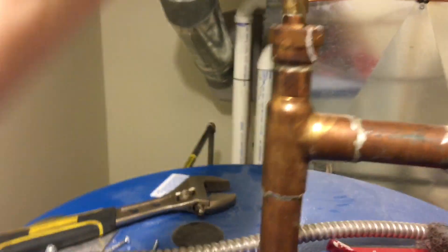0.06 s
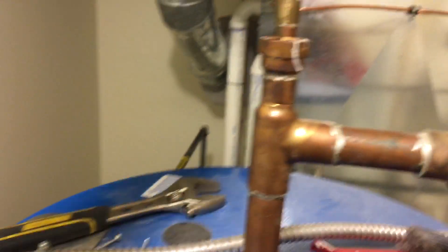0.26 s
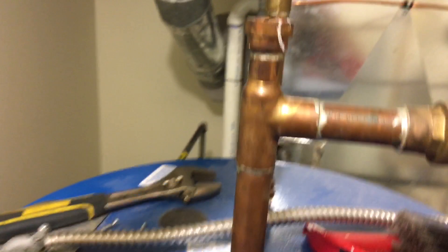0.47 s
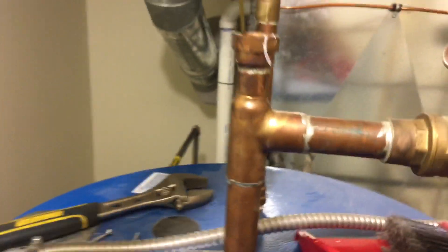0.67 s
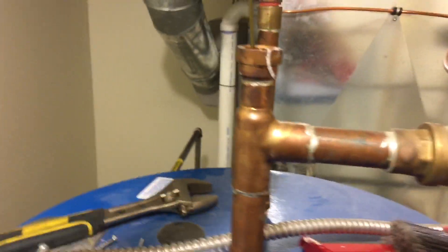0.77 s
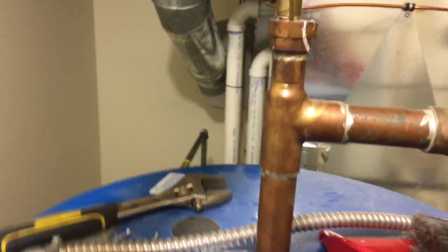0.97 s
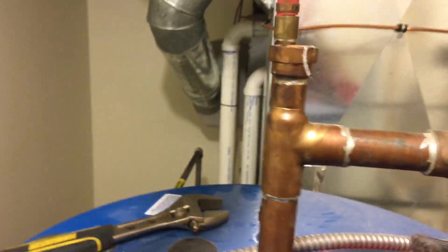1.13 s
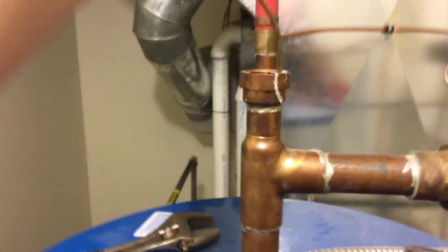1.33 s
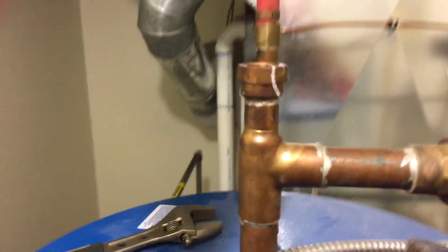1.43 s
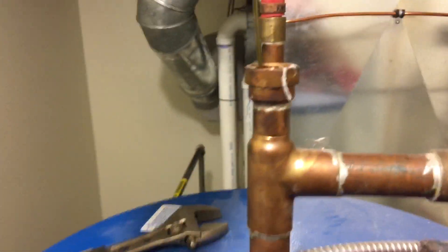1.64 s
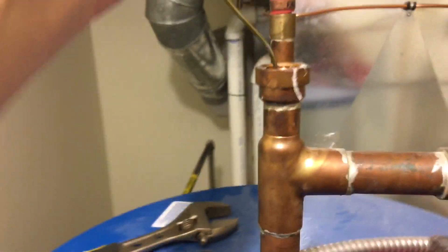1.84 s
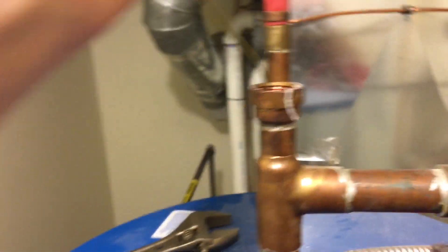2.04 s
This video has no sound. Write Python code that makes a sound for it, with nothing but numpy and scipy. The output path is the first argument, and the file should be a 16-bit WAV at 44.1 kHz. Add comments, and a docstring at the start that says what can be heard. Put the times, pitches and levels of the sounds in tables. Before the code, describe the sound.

A stiff wire clanks and scrapes inside a copper pipe, close up in a small hard-walled room. Clusters of sharp, briefly ringing knocks come around 0.3, 0.9, 1.1, 1.4 and 1.7 seconds, with lighter taps and short squeaky scrapes between. The knocks thin out after 1.8 seconds. Underneath, the water heater tank rumbles softly, a little more from 1.4 seconds, over a faint rush of room air.

```python
"""In a small hard-walled room, a stiff wire is worked up and down in a water heater's copper pipe.
Each knock shakes the pipework near 1 kHz, cracks, and rings three high notes in the tube wall.
Between knocks the wire catches and slips along the inside, which makes it scrape and squeak.
Underneath, the jostled tank rumbles and the room air gives a faint rush."""
import sys
import numpy as np
from scipy import signal
from scipy.fft import rfft, irfft
from scipy.io import wavfile

SR = 44100
rng = np.random.default_rng(int(sys.argv[2]) if len(sys.argv) > 2 else 0)


def store_pcm(level_fs):
    """Save levels as 16-bit WAV."""
    pcm = np.round(np.clip(level_fs, -1, 1) * 32767).astype(np.int16)
    wavfile.write(sys.argv[1], SR, np.atleast_2d(pcm).T)


N = 92610
T = np.arange(N) / SR
CLONK_RISE_S, CRACK_RISE_S, SLOW_RISE_S = 0.00064, 0.0002, 0.015
# sliding strokes of the wire: start/s, length/s, pipework level/dB, bright rasp level/dB
STROKES = [(.005, 0.055, -38, -50.5), (0.317, 0.15, -36, -33), (0.687, 0.08, -36, -29.5),
           (0.802, 0.11, -39, -27), (0.977, 0.073, -39.5, -31.5), (1.076, 0.072, -35.5, -32),
           (1.32, 0.046, -36.5, -35), (1.37, 0.038, -26.5, -19), (1.61, 0.081, -41, -51.5),
           (1.667, .03, -29.5, -17)]


def pipe(spot_count=3):
    """The wire knocks on a few spots in turn, each with its own tone, and scrapes on the first."""
    # the wire hits: t/s, then level/dB of low clonk, high clonk, crack and each of three wall notes
    hits = [(.091,-70,-67,-44.5,-83,-82,-84), (.166,-38,-34,-33.5,-45,-52,-37.5),
            (.222,-28.5,-28.5,-60,-67,-68,-57), (.238,-24,-27,-27,-32,-36,-33),
            (.259,-58,-21.5,-27.5,-42,-47,-34), (.272,-52,-17,-33,-24.5,-10,-15.5),
            (.2765,-21.5,-32,-27.5,-20,-45,-39), (.291,-29.5,-26,-25,-50,-44,-25),
            (.431,-34.5,-20.5,-35,-30.5,-43,-29.5), (.539,-36.5,-29,-37,-59,-46,-64),
            (.694,-36,-28,-31.5,-32.5,-38,-30), (.705,-41,-25.5,-52,-53,-47,-27),
            (.858,-35,-22.5,-46,-40,-27,-42), (.864,-26.5,-22,-22,-18.5,-26,-16),
            (.872,-29,-23,-31.5,-36.5,-34.5,-39), (1.121,-59,-26,-25.5,-30,-55,-42),
            (1.130,-27.5,-15.5,-22,-19,-30,-14.5), (1.135,-30,-22,-30,-25,-29,-44),
            (1.210,-32.5,-31,-37.5,-24,-25,-26), (1.363,-22,-18.5,-24,-17,-14,-18.5),
            (1.382,-19,-24.5,-27.5,-25,-37,-23), (1.400,-33.5,-20,-24,-29,-35,-45),
            (1.497,-41,-28,-42.5,-33,-37,-49), (1.540,-51,-29,-35.5,-51,-26.5,-33),
            (1.551,-35.5,-28.5,-28,-32,-29,-32), (1.572,-29.5,-25.5,-39,-45,-49,-39),
            (1.640,-51,-57,-39.5,-44,-41.5,-47), (1.659,-31,-22.5,-33.5,-39,-26,-31),
            (1.682,-29,-19,-28.5,-28.5,-20,-35.5), (1.697,-40,-23.5,-30.5,-39,-12.5,-17.5),
            (1.701,-51,-23,-31.5,-26.5,-18.5,-27), (1.773,-32,-20,-23,-32.5,-42,-32),
            (1.790,-23.5,-20.5,-26,-24,-30,-34.5), (1.870,-38.5,-37,-42,-50,-46,-52),
            (1.976,-46.5,-45.5,-42,-44,-63.5,-53.5), (2.092,-39.5,-36,-29.5,-36,-46.5,-50.5)]
    # clear pings left by some knocks: t/s, level/dB
    pings = [(.432, -29.5), (.70, -35.5), (.87, -36), (1.135, -27), (1.775, -30.5)]
    # the wire's own notes in a ping: f/Hz, level/dB, fade time/s
    wire_notes = [(2640, -6, .22), (2695, 0, .33), (2755, -2, .3), (2850, -4, .25)]
    spots = np.array([pipe_voices() for _ in range(spot_count)])
    forces = np.array([knocks(hits[k::spot_count]) for k in range(spot_count)])
    forces[0] += scrapes() / np.linalg.norm(spots[0], axis=1, keepdims=True)
    struck = sum(signal.fftconvolve(force, spot, axes=1).sum(axis=0)
                 for force, spot in zip(forces, spots))
    return (struck + signal.fftconvolve(impulses(pings), ring(wire_notes)))[:N]


def pipe_voices():
    """One tap sets off seven sounds that echo in the room: two clonks, crack, three wall notes, tick."""
    # notes of the clonks (the two lowest are the tank, set ringing by each clonk) and the tube wall's tick:
    # f/Hz, level/dB, fade time/s
    low_notes = [(381, -26.5, 0.49), (442, -23, 0.69), (656.4, -10, 0.31), (765.7, -8, 0.34),
                 (821, 1, 0.075), (904.5, -5, 0.15)]
    high_notes = [(1048, 9.5, 0.037), (1152, -34, 0.094), (1100, -20.5, 0.34), (1199, 3, 0.049),
                  (1238.5, -3.5, 0.19), (1292, -14.5, 0.12), (1450, -16, 0.38), (1804, -17.5, 0.22)]
    tick_notes = [(12325, -15, .12), (14510, -7, .11)]
    # tone of the noise in each sound: f/Hz, level/dB
    low_colour = [(180, -6), (400, -5), (540, -32.5), (780, 7.5), (930, -20.5), (1200, -14)]
    high_colour = [(800, -27), (1000, 4), (1250, 2), (1420, -6), (2400, -12)]
    crack_colour = [(1000, -1.5), (1750, -2.5), (2100, 0.5), (2720, 6.5), (3300, -5), (4050, -0.5),
                    (4500, -3), (5200, -4), (6800, -6), (12000, -41)]
    tick_colour = [(4500, -4), (7200, 8.5), (10300, 3.5), (11500, 8.5), (13500, 5), (16000, -12.5)]
    # notes of the tube wall: f/Hz, quick fade time/s, lingering level/dB, lingering fade time/s
    wall_notes = [(5837.5, 0.05, -25, 0.61), (7752, 0.028, -38.5, 0.26), (9520, 0.028, -23.5, 0.15)]
    # room echo of each of the seven sounds: level/dB in one list, fade time/s in the other
    echo_levels = [-7, -9.5, -8, -10, -13, -22, -12]
    echo_fades = [0.37, 0.39, 0.42, 0.3, 0.336, 0.5, 0.24]
    direct, colours = [], [low_colour, high_colour, crack_colour]
    for notes, colour in (low_notes, low_colour), (high_notes, high_colour):
        clonk = ring(notes) + from_db(-15) * noise(colour) * fade(0.15)
        direct.append(clonk * rise(CLONK_RISE_S))
    direct.append(noise(crack_colour) * fade(0.084) * rise(CRACK_RISE_S))
    for hz, quick_s, linger_db, linger_s in wall_notes:
        band = [(hz + 260 * k, db) for k, db in ((-4, -30), (-1, -14), (0, 0), (1, -14), (4, -30))]
        twin = (hz + 110, linger_db - 4.5, linger_s)  # a slightly oval tube gives each note a twin
        tone = ring([(hz, 0, quick_s), twin, (hz, linger_db, linger_s)])
        hiss = from_db(-11.5) * noise(band) * fade(quick_s)
        direct.append((tone + hiss) * rise(CRACK_RISE_S))
        colours.append(band)
    tick = noise(tick_colour) * fade(0.024) + ring(tick_notes)
    direct.append(tick * rise(CRACK_RISE_S))
    colours.append(tick_colour)
    return [even_start(sound) + from_db(db) * noise(colour) * rise(SLOW_RISE_S) * fade(fade_s)
            for sound, colour, db, fade_s in zip(direct, colours, echo_levels, echo_fades)]


def knocks(hits):
    """Where the wire lands decides how hard each of the seven sounds is struck."""
    times, low, high, crack, *wall = np.transpose(hits)
    tick = (crack + np.max(wall, axis=0)) / 2 - 0.5  # follows the crack and the loudest wall note
    return [impulses(zip(times, db)) for db in (low, high, crack, *wall, tick)]


def scrapes(slips_per_s=560, edge_s=0.012):
    """The sliding wire slips again and again, giving the pipe many tiny uneven pushes."""
    # share of the rasp in the crack, three wall notes and tick: level/dB
    rasp_shares = [-11.5, -14, -13, -11, -11.5]
    body, rasp = 0, 0
    for start, length, body_db, rasp_db in STROKES:
        stroke = np.clip(np.minimum(T - start, start + length - T) / edge_s, 0, 1)
        body += from_db(body_db) * stroke
        rasp += from_db(rasp_db) * stroke
    push = np.array([body / np.sqrt(2)] * 2 + [from_db(db) * rasp for db in rasp_shares])
    slipping = rng.random(N) < slips_per_s / SR
    slips = slipping * from_db(2 * rng.standard_normal(N)) * rng.standard_normal(push.shape)
    return slips / slips.std() * push


def squeaks(per_s=580, most_per_stroke=64, low_hz=3730, high_hz=13000):
    """The wire sticks and lets go during each stroke, making tiny squeaks at chance pitches."""
    out, t = np.zeros(N + SR), T[:SR // 10]
    shape = (fade(0.046) * rise(CLONK_RISE_S))[:len(t)]
    for start, length, _, rasp_db in STROKES:
        for when, pitch, size in rng.random((most_per_stroke, 3))[:int(length * per_s)]:
            hz = low_hz * (high_hz / low_hz) ** pitch
            at = int((start + when * length) * SR)
            out[at:at + len(t)] += size * from_db(rasp_db - 11.5) * shape * np.sin(2 * np.pi * hz * t)
    return out[:N]


def tank():
    """Pushing the plumbing about makes the tank rumble, boom and give a few ringing thumps."""
    # loudness of the rumble: t/s, deep level/dB, boom level/dB
    rumble = [(0, -43, -48.5), (.3, -45, -44.5), (1.0, -44.5, -45.5), (1.38, -45, -43), (1.46, -36.5, -43),
              (2.1, -38.5, -43)]
    # tone of the deep rumble and the hollow boom: f/Hz, level/dB
    deep_colour = [(30, -29.5), (48, -11), (75, -0.5), (100, -7.5), (122, 1), (170, -22.5)]
    boom_colour = [(110, -8), (155, 4.5), (270, 5), (330, -14.5), (440, -16)]
    # bumps against the tank: t/s, level/dB
    bumps = [(.228, -30), (.865, -43.5), (1.385, -42.5)]
    # notes of the bumped tank: f/Hz, level/dB, fade time/s
    tank_notes = [(158.4, -1.5, 1), (217.5, -0.5, 1.0), (227.4, -3.5, 1.0), (239.4, 2, 0.82)]
    times, deep_db, boom_db = np.transpose(rumble)
    deep = from_db(np.interp(T, times, deep_db)) * noise(deep_colour)
    boom = from_db(np.interp(T, times, boom_db)) * noise(boom_colour)
    thump = (ring(tank_notes) + from_db(1.5) * noise(boom_colour) * fade(0.3)) * rise(SLOW_RISE_S)
    return deep + boom + signal.fftconvolve(impulses(bumps), thump)[:N]


def room_air():
    """The still room gives a faint, steady, low rush."""
    return from_db(-48) * noise([(100, 1), (400, -2.5), (1000, -5.5), (2000, -13.5), (16000, -35.5)])


def ring(notes):
    """Struck metal rings with fading pure tones, each a little stronger or weaker every time."""
    out = np.zeros(N)
    for k, (hz, db, fade_s) in enumerate(notes):
        strength = from_db(db + rng.uniform(-6.75, 2.25))
        out += (-1) ** k * strength * np.sin(2 * np.pi * hz * T) * fade(fade_s)
    return out


def noise(colour):
    """Noise of strength 1, shaped by rows of f/Hz, level/dB and falling away beyond both ends."""
    hz, db = np.transpose(colour)
    f = np.maximum(np.arange(N // 2 + 1) * SR / N, 1)
    gain = from_db(np.interp(np.log(f), np.log(hz), db))
    ends = np.minimum(f / hz[0], 1) ** 2 * np.minimum(hz[-1] / f, 1) ** 2
    x = irfft(rfft(rng.standard_normal(N)) * gain * ends, N)
    return x / x.std()


def impulses(rows):
    """One sharp push for each row of t/s, level/dB."""
    force = np.zeros(N)
    for time, db in rows:
        force[int(time * SR)] += from_db(db)
    return force


def even_start(x):
    """Scale a sound to strength 1 over its first 8 ms."""
    return x / np.sqrt(np.mean(x[:int(.008 * SR)] ** 2))


def rise(rise_s):
    """A smooth start from silence."""
    return 1 - np.exp(-(T / rise_s) ** 2)


def fade(fade_s):
    """Die away by 60 dB in the fade time."""
    return from_db(-60 * T / fade_s)


def from_db(db):
    """Turn decibels into a multiplier."""
    return 10 ** (np.asarray(db) / 20)


def scene():
    """Pipe, tank, room air and squeaking wire, heard close up in one channel."""
    return (pipe() + tank() + room_air() + squeaks())[None]


def record(dry, cutoff_hz=16200):
    """Flatten the loudest peaks and cut the highest treble."""
    limited = dry / (1 + dry ** 4) ** .25
    return signal.sosfilt(signal.ellip(10, .2, 90, cutoff_hz, fs=SR, output="sos"), limited)


dry = scene()
out = record(dry)
store_pcm(out)
```